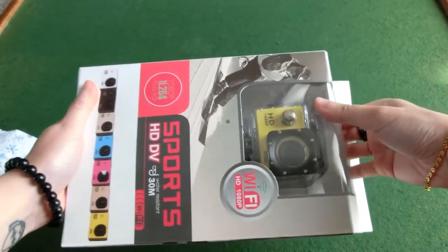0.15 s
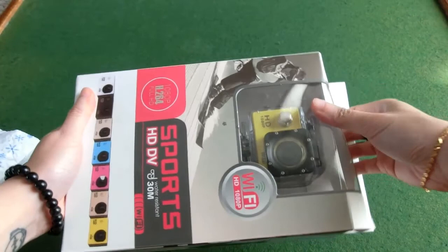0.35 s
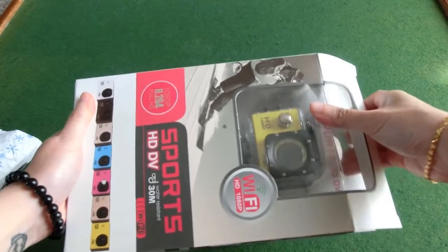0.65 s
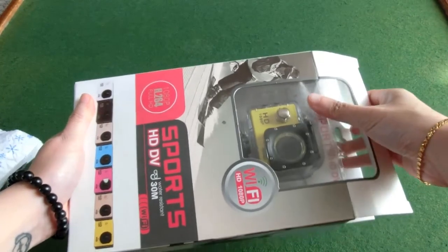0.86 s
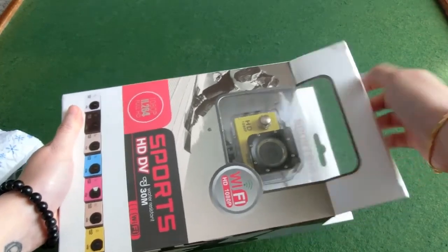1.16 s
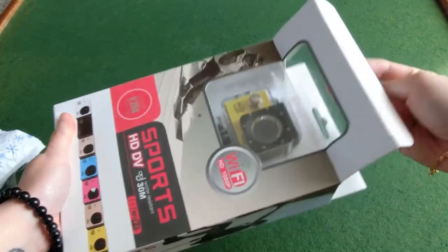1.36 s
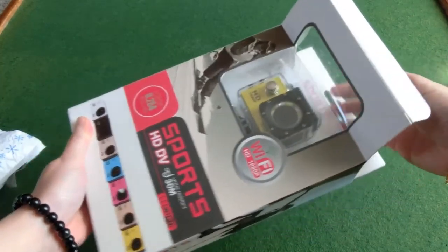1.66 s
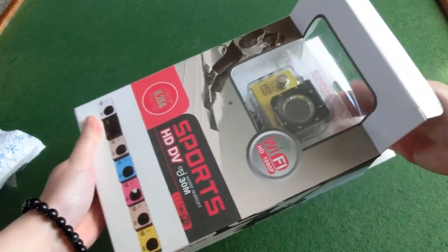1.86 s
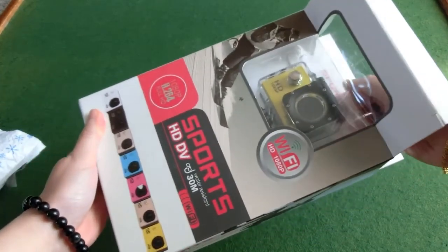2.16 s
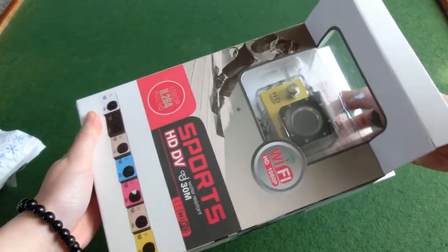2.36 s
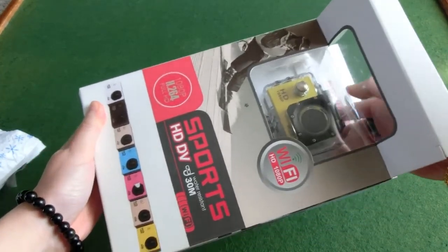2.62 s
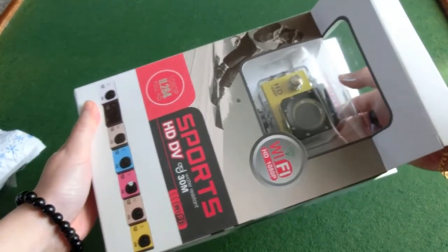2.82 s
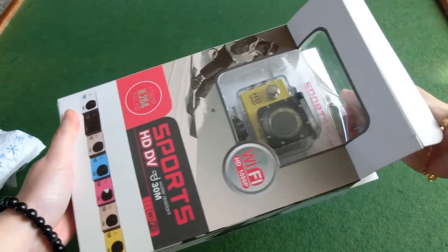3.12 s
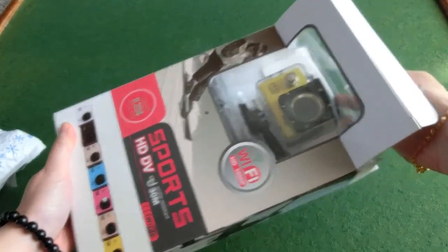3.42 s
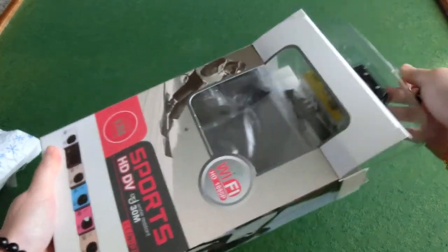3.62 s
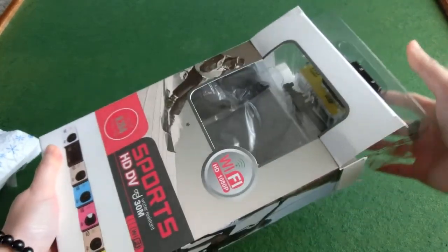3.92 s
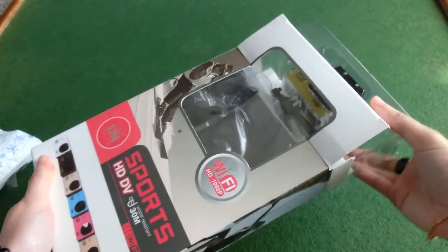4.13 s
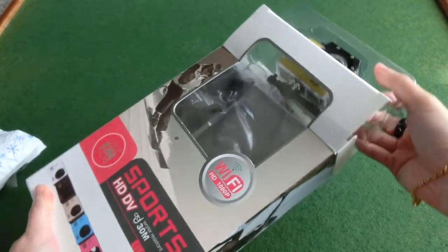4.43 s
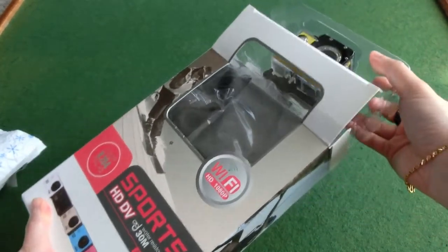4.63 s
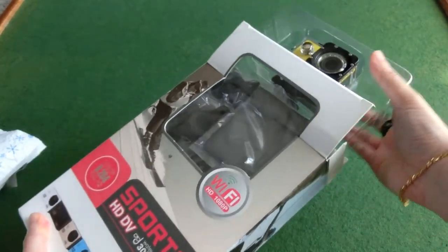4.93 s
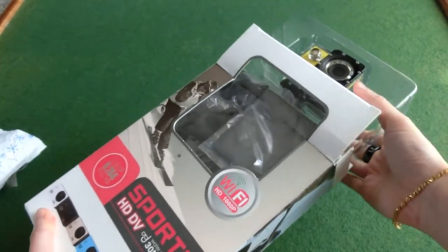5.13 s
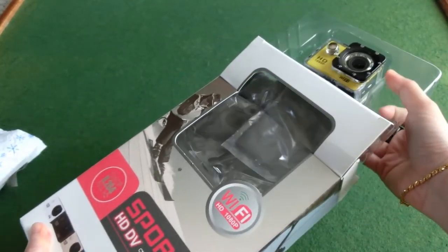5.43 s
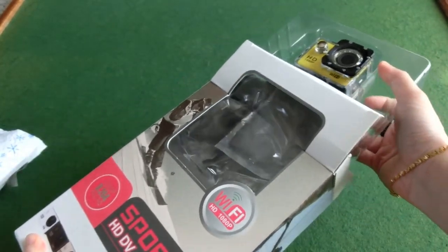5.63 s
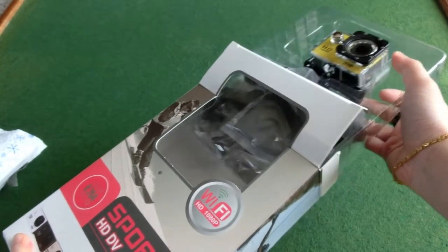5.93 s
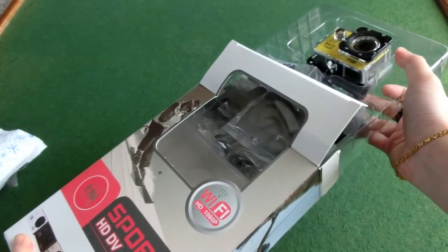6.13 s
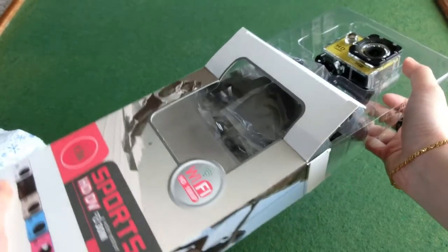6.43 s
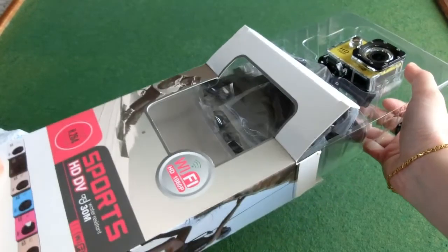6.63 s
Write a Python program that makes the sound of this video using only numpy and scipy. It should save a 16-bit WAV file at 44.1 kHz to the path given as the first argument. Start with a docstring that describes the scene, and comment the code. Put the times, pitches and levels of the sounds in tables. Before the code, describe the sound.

In a small room, close to the microphone, hands work at a cardboard box and its thin plastic tray. A sharp snap lands at 0.1 s, over friction that quickly thins; creaking begins near 0.4 s and a loud crack with a scrape follows at 0.6 s. A low, hollow thud at 1.1 s leads into a strong snap at 1.2 s. From 1.5 to 2.2 s there are only small creaks and soft dull knocks, clearest near 2 s. A very bright double snap strikes at 2.9 s. Plastic squeaks and rubs around 3.4 to 3.8 s, with a knock, then a sparser stretch. A lone snap comes at 4.7 s. From 5.4 s crackles thicken, strongest at 5.9 to 6.0 s, then thin to ticks and faint squeaks from 6.6 s. A short room tail and quiet steady hiss remain throughout.

```python
"""Small room, phone close by: hands pull open a cardboard box's end flap and drag out a thin plastic tray.
Snaps come at once, stronger at 0.6 s and 1.2 s; creaks and dull knocks lead to a bright pair at 2.9 s.
Squeaks follow around 3.5 s, a lone snap at 4.7 s, a dense run from 5.4 s and thin squeaks from 6.6 s.
Buckling bursts ring panels and box modes; stick-slip noise makes the rubs, crackles and squeaks between.
Low thuds, a short room tail and a quiet steady hiss complete the scene at two microphone ports."""
import sys
import numpy as np
from scipy import signal
from scipy.fft import rfft, irfft, next_fast_len
from scipy.io import wavfile
from scipy.ndimage import uniform_filter1d

SR = 44100
rng = np.random.default_rng(int(sys.argv[2]) if len(sys.argv) > 2 else 0)


def wrap_up_sound(samples):
    """Save the sound to the file named by the first command line argument, as 16-bit audio."""
    columns = np.atleast_2d(samples).T
    # keep every value between -1 and 1, then stretch to whole-number steps
    tamed = np.clip(columns, -1, 1)
    steps = np.round(tamed * 32767).astype(np.int16)
    wavfile.write(sys.argv[1], SR, steps)


N = 298767

# card and plastic buckle: [t/s, crack decay/s, card panel f/Hz, plastic sheet f/Hz, level/dB,
# brightness per register/dB, hollow thump above the level/dB]
BUCKLES = [(0.1055, 0.0046, 860, 2870, -32, 4, -14), (.118, 0.00078, 895, 2800, -18, -2, -13.5),
           (.2103, 0.005, 302, 2800, -40.5, -2.5, 3.5), (0.2443, 0.0062, 178, 2660, -39.5, 1.5, -1.5),
           (0.472, 0.00041, 875, 4240, -43, 6.5, -9), (.5741, .001, 1100, 4000, -44.5, 9.5, -17),
           (0.6249, 0.0086, 810, 2370, -16.5, -1, -14), (0.6287, .0005, 760, 1980, -26, -3.5, 3.5),
           (0.64, 0.0023, 670, 2830, -32, 5, -24), (0.6716, 0.00077, 670, 4350, -24.5, 1.5, -3),
           (.786, 0.0052, 236, 4100, -38, 9.5, 2.5), (0.8459, 0.0012, 930, 1930, -44, 2.5, -24),
           (0.9326, 0.00047, 300, 2080, -48, -2.5, -4), (1.0671, 0.036, 1280, 1910, -36.5, 5, 4),
           (1.084, 0.0083, 740, 1590, -35, -12, 6.5), (1.169, 0.0026, 350, 1770, -19.5, 4, -4.5),
           (1.1746, 0.004, 870, 2250, -24.5, -0.5, -7.5), (1.293, 0.0037, 520, 1640, -33, -10, 4),
           (1.541, 0.00065, 470, 2900, -50, -4, -3), (2.247, 0.0016, 960, 1670, -33.5, -2, -13),
           (2.6802, 0.0053, 560, 1540, -33, -3, 3), (2.7724, 0.0021, 820, 3270, -28.5, -0.5, -0.5),
           (2.892, 0.0028, 1120, 2640, -17.5, 1.5, -6.5), (2.9074, 0.0023, 1160, 3700, -15.5, 5, -11.5),
           (3.1044, 0.0051, 1260, 2960, -52, -3.5, -8), (3.154, 0.0012, 1270, 1580, -50.5, -5.5, -22),
           (3.248, 0.00089, 647, 2130, -53.5, -0.5, -12), (3.4104, 0.0037, 705, 3100, -35.5, -9, 4),
           (3.4393, 0.0082, 740, 1620, -41.5, -5, -2), (3.5069, 0.0052, 835, 5330, -38, -1.5, -1),
           (3.5877, 0.0045, 650, 4000, -29.5, 1, -2.5), (3.6216, .0022, 417, 2700, -29.5, .5, -0.5),
           (4.031, 0.0041, 637, 1580, -52.5, -3.5, 1), (4.3495, 0.0063, 1166, 1630, -38.5, -1.5, -4.5),
           (4.3787, 0.0063, 1190, 5000, -38.5, -2, -7), (4.4358, 0.0024, 736, 1540, -41, 2.5, -9),
           (4.67, 0.00083, 770, 5040, -51, 9.5, -10), (4.713, .0017, 1170, 4800, -49, 15.5, -33),
           (4.7306, 0.0045, 791, 2330, -23, -0.5, -9.5), (4.916, 0.0023, 1290, 1540, -37.5, 5, -1),
           (5.061, 0.0024, 410, 4000, -41.5, 3, -0.5), (5.3452, 0.0071, 890, 3050, -38, 6, -9),
           (5.4317, .004, 370, 4180, -46, 12, -2), (5.47, .0016, 866, 6200, -38.5, 8, -2),
           (5.4781, 0.0007, 1170, 6740, -38.5, 11, -6), (5.54, .0014, 955, 3600, -30.5, -0.5, -7.5),
           (5.6381, 0.00028, 765, 3540, -41, 5.5, -14), (5.687, 0.001, 374, 6540, -46.5, 5.5, -9),
           (5.7077, .0022, 365, 6600, -46.5, 5, -10), (5.8084, 0.00052, 905, 3320, -41, 7, -20),
           (5.8235, 0.0092, 830, 1580, -31.5, -2, -7), (5.8509, .0008, 251, 2840, -31, -0.5, -2),
           (5.8692, 0.0022, 840, 3720, -28.5, 7, -13), (5.8808, 0.0065, 785, 2920, -20.5, .5, -14),
           (5.9078, 0.00073, 775, 2830, -29.5, 3, -25), (5.9451, .002, 760, 2660, -42, 10, -19),
           (6.0117, 0.0037, 813, 3230, -20.5, -5, -1), (6.1245, 0.00079, 800, 3000, -33.5, 6, -14),
           (6.3021, .0011, 1230, 4360, -40, 1, -34), (6.3386, .001, 1220, 5240, -46.5, 0, -22),
           (6.3707, 0.0041, 810, 2500, -44.5, -0.5, -23), (6.4397, 0.0012, 1320, 1600, -47, 1.5, -22),
           (6.518, 0.0018, 870, 4430, -39, -3.5, -24), (6.5746, 0.00018, 530, 3970, -45, 3, -14)]
# fingers and tray knock dully on the box: [t/s, card panel f/Hz, level at that f/dB]
DULL_KNOCKS = [(0.0496, 362, -39.5), (0.884, 170, -37), (1.2707, 310, -40.5), (1.527, 390, -38.5),
               (1.547, 346, -38.5), (1.617, 217, -40), (1.659, 350, -42), (1.737, 232, -40),
               (1.9321, 284, -32), (1.9526, 464, -34), (1.986, 398, -29.5), (2.1012, 850, -42.5),
               (2.7126, 720, -37), (2.808, 228, -29), (3.789, 1190, -43), (3.8321, 463, -28),
               (4.178, 227, -42.5), (4.207, 553, -40.5), (4.83, 680, -40), (4.9493, 784, -44),
               (6.5546, 410, -30)]
# modes of the box with its tray: [f/Hz, t60/s, relative level/dB]
BOX_MODES = [(130.3, 0.072, -15.5), (266, 0.044, -13), (342, 0.022, -10.5), (505, 0.028, -6.5),
             (684, 0.029, -11.5), (778.5, 0.042, -0.5), (839, 0.057, -9.5), (1116, 0.023, -12.5),
             (1390, 0.0065, -15.5), (1488, 0.02, -8.5), (2180, 0.026, -16), (2305, 0.016, -1.5),
             (2580, 0.018, -5.5), (3304, 0.015, -11.5), (4080, 0.0086, -1), (5270, 0.013, -5.5),
             (6280, 0.01, -9.5)]
# colour of a crack: [f/Hz, relative density level/dB per Hz]
CRACK_COLOUR = [(130, -9), (300, 3), (600, -1), (1200, 0), (1800, -5), (3000, -4.5), (4200, -11.5),
                (5500, -10), (6800, -7.5), (8000, -5), (12000, -8.5), (16000, -20)]
# the whole box jolts against hand and table: [t/s, f/Hz, level of the swing before its decay/dB]
JOLTS = [(.212, 90, -41), (0.631, 80, -35), (0.787, 100, -39.5), (.878, 120, -39), (1.083, 135, -23.5),
         (1.173, 75.5, -36), (1.292, 90, -45), (1.992, 60, -45), (2.805, 95, -39), (2.898, 70, -34.5),
         (3.835, 91.4, -43.5), (4.731, 70, -46), (5.86, 70, -35.5), (6.01, 85, -36), (6.556, 129, -34)]
# a hand pushes and card and plastic slide: [t of fastest motion/s, rise/s, fall/s, level before the mix/dB,
# brightness per register/dB, hollow rumble above the level/dB]
HAND_STROKES = [(.16, 0.072, 0.45, -48, 0, -4.5), (0.471, 0.027, 0.071, -40.5, -0.5, -1),
                (0.591, 0.011, .02, -45, -2.5, 1), (.655, 0.011, 0.051, -32.5, 1.5, -8.5),
                (0.792, .015, 0.022, -39.5, -3, 0), (.9, 0.044, 0.016, -56.5, -9, 8.5),
                (1.086, 0.015, 0.02, -40.5, -11.5, 4), (1.21, 0.016, 0.033, -46.5, -6, 1),
                (1.33, 0.06, 0.029, -55, -9, -2), (1.446, 0.013, 0.0073, -48.5, 2, 5),
                (1.51, 0.13, 0.073, -52.5, 8.5, 1), (1.75, 0.07, 0.044, -56, 7, 2),
                (1.94, 0.039, 0.068, -41.5, 0.5, 3.5), (2.12, 0.056, 0.054, -54, 1, -4),
                (2.276, 0.028, 0.057, -51.5, -2, -20), (2.58, 0.15, 0.046, -62, -8, 4),
                (2.795, 0.042, 0.039, -43.5, 1, 2), (3.02, .03, 0.018, -43.5, -3.5, -3.5),
                (3.165, 0.053, 0.024, -51.5, -2, -9), (3.28, 0.037, 0.052, -58, -2.5, -23),
                (3.6, 0.082, 0.07, -39.5, -1.5, -3.5), (3.78, 0.041, 0.075, -52.5, 4.5, 5.5),
                (4.059, 0.016, 0.052, -59, 3, 8), (4.201, 0.017, 0.032, -56.5, -1, 2.5),
                (4.458, 0.065, 0.062, -50.5, -0.5, -4), (4.755, 0.038, 0.09, -46, -2, -2.5),
                (4.937, 0.03, 0.041, -44.5, -1.5, 3), (5.079, 0.036, 0.02, -50, 2, 3),
                (5.22, 0.023, 0.11, -57.5, -5, 7), (5.44, 0.062, 0.067, -38, 2, -9.5),
                (5.579, 0.046, 0.033, -50, -4.5, -13), (5.67, 0.029, 0.064, -51, 3.5, -12),
                (5.891, 0.046, 0.041, -33, -3.5, 0), (6.6, 0.071, 0.067, -52.5, 3.5, -12)]
# the hands never lie quite still on the box: [t/s, friction level before the mix/dB]
RESTING_HANDS = [(0, -47.5), (.4, -64), (1, -64.5), (1.8, -71.5), (2.5, -59), (3.3, -65.5), (4, -73.5),
                 (4.6, -69.5), (5.3, -65.5), (6.2, -63), (6.77, -61.5)]
# colour of the friction: [f/Hz, relative density level/dB per Hz]
FRICTION_COLOUR = [(110, -1), (260, 2), (400, 7.5), (620, 0.5), (790, 3), (960, -0.5), (1300, 0.5),
                   (1800, -5), (2900, -3.5), (4300, -7), (5600, -8.5), (8000, -8), (11000, -8.5),
                   (15500, -22)]
# plastic creaks and squeaks on card; slow slips creak, fast ones sing:
# [t/s, length/s, resonance f/Hz, nominal width/Hz, nominal slips per s, level before the fades/dB]
CREAKS_AND_SQUEAKS = [(0.411, .135, 1950, 600, 120, -41), (0.428, .19, 4220, 377, 125, -50),
                      (1.5, 0.1, 2700, 500, 220, -60), (1.466, .094, 3740, 370.4, 250, -50.5),
                      (1.579, 0.056, 3100, 500, 250, -55), (1.694, 0.11, 5230, 410, 400, -57),
                      (1.87, 0.18, 2850, 700, 90, -45), (3.241, 0.071, 2910, 110, 900, -53.5),
                      (3.44, 0.082, 5650, 300, 900, -52), (3.455, 0.17, 3170, 200, 900, -48.5),
                      (3.499, 0.036, 5300, 166.7, 900, -41.5), (3.54, .038, 2960, 400, 600, -42),
                      (3.7, 0.18, 1390, 231.5, 350, -47.5), (5.056, 0.067, 2370, 200, 900, -56),
                      (5.633, 0.043, 4760, 300, 500, -47.5), (6.61, 0.21, 1890, 111, 900, -55.5),
                      (6.614, 0.15, 5240, 170, 900, -66), (6.62, .2, 3870, 201, 900, -59.5),
                      (6.634, .2, 2500, 139, 900, -60)]
# edges of the four registers, hollow of the box, card panels, plastic sheet, sharp edges: [f/Hz]
REGISTER_EDGES = [150, 480, 1400, 4800, 16000]
# decay of the room: [f/Hz, t60/s]
ROOM_DECAY = [(100, 0.24), (260, 0.19), (700, 0.2), (2000, 0.24), (5000, 0.34), (14000, 0.18)]
# room tail against the sound sent into it: [f/Hz, level/dB]
ROOM_TAIL = [(100, -15), (300, -7.5), (800, -10), (2000, -11), (5000, -12), (14000, -12)]
# filter of the difference between the two microphone ports: [f/Hz, gain/dB]
PORT_DIFFERENCE = [(30, -18.5), (100, -21), (300, -46), (700, -38.5), (1400, -38.5), (2800, -19),
                   (5600, -8), (11000, -4), (15000, 2)]
# colour of the background hiss: [f/Hz, relative density level/dB per Hz]
HISS_COLOUR = [(12, -30), (20, 5.5), (130, 6), (388, -0.5), (849, -2), (1000, -14), (1370, -9),
               (1960, -12.5), (2910, -16.5), (4810, -17.5), (11100, -25.5), (14700, -19.5), (16000, -54)]

DIRECTIONS = 4  # a bent sheet sends a different waveform each way
SHEET_RING_S = 0.0013  # fall to 1 / e: thin plastic is damped by the card around it
EDGE_DB = -5.5  # the sharp edges' register lies under the others
KNOCK_SHEET_HZ = 2183  # the slack plastic that a dull knock stirs
KNOCK_S, KNOCK_FALL_DB_PER_OCT = 0.0018, 9  # soft contact: thinner away from the panel's pitch
STROKE_SHAPE = 1.32  # 1 = pointed swell, 2 = bell
HOLD_BRIGHTNESS_DB, HOLD_HOLLOW_DB = 2, -3
# tiny creases give way while the plastic slides; their level is relative to the plastic's friction
CRINKLES_PER_S, CRINKLE_DB, CRINKLE_SCATTER_DB, CRINKLE_S = 130, -5.5, 3, 0.00088
HISS_DB = -60  # the part common to both ports
TOP_HZ = 15600


def snaps():
    """Card and plastic sheets buckle, each with a crack decay of its own."""
    return strike_box([(t, crack_s, panel_hz, sheet_hz, registers(*contact))
                       for t, crack_s, panel_hz, sheet_hz, *contact in BUCKLES])


def knocks():
    """Soft blows by fingers and tray: the sound thins out in octaves away from the panel's pitch."""
    centres = np.sqrt(np.multiply(REGISTER_EDGES[:-1], REGISTER_EDGES[1:]))
    contacts = []
    for t, panel_hz, db in DULL_KNOCKS:
        levels = db - KNOCK_FALL_DB_PER_OCT * np.abs(np.log2(centres / panel_hz))
        contacts.append((t, KNOCK_S, panel_hz, KNOCK_SHEET_HZ, levels))
    return strike_box(contacts)


def strike_box(contacts, panel_db=-7, panel_cycles=2.2, sheet_db=-9, box_db=-14, scatter_db=5.0,
               rattle_db=-25, rattle_s=0.0027, rise_s=0.00013, tick_rough=0.42):
    """A brief crack and a weaker rattle burst; card and plastic swing a few cycles and the box modes ring."""
    out, t = np.zeros((DIRECTIONS, N)), np.arange(3072) / SR
    filters = [bandpass(lo, hi) for lo, hi in zip(REGISTER_EDGES, REGISTER_EDGES[1:])]
    hz, t60, db = np.transpose(BOX_MODES)
    modes = np.sin(2 * np.pi * hz[:, None] * t) * undb(db[:, None] - 60 * t / t60[:, None])
    spread = np.sqrt(0.01 * SR / len(t))  # levels are rms over 10 ms
    for start, crack_s, panel_hz, sheet_hz, levels in contacts:
        force = np.exp(-t / max(crack_s, 1 / SR)) * (1 - np.exp(-t / rise_s))
        force = force / force.max() + undb(rattle_db) * np.exp(-t / rattle_s)
        # roughness held for 16 samples at a time
        slips = np.exp(tick_rough * np.repeat(rng.standard_normal(len(t) // 16), 16))
        crack = colour(force * slips * rng.standard_normal((DIRECTIONS, len(t))), CRACK_COLOUR)
        panel = undb(panel_db) * ring(t, panel_hz, panel_cycles)
        sheet = undb(sheet_db) * ring(t, sheet_hz, sheet_hz * SHEET_RING_S)
        # every direction favours other modes
        shape = (DIRECTIONS, len(hz))
        shares = undb(scatter_db * rng.standard_normal(shape)) * rng.choice([-1, 1], shape)
        blow = crack + panel + sheet + undb(box_db) * shares @ modes
        bands = [undb(level) * unit(signal.sosfilt(f, blow)) for f, level in zip(filters, levels)]
        add(out, start, spread * sum(bands))
    return out


def registers(db, brightness_db, hollow_db):
    """Levels of hollow, card, plastic and edges: a harder contact tips the sound from card towards edges."""
    return db + np.array([hollow_db, -brightness_db, 0, brightness_db + EDGE_DB])


def ring(t, hz, cycles):
    """A damped swing that falls to 1 / e after the given number of cycles."""
    return np.sin(2 * np.pi * hz * t) * np.exp(-t * hz / cycles)


def bumps(cycles=1.3):
    """Soft, heavily damped thuds of the box as a whole."""
    out, t = np.zeros((DIRECTIONS, N)), np.arange(SR // 10) / SR
    for start, hz, db in JOLTS:
        add(out, start, undb(db) * ring(t, hz, cycles)[None])
    return out


def sliding():
    """Strength of the friction in each register: strokes swell and die away over the resting hands."""
    t = np.arange(N) / SR
    hold = undb(np.interp(t, *np.transpose(RESTING_HANDS)))
    power = np.outer(undb(registers(0, HOLD_BRIGHTNESS_DB, HOLD_HOLLOW_DB)), hold) ** 2
    for peak, rise_s, fall_s, *contact in HAND_STROKES:
        near = np.abs(t - peak) < 0.5
        distance = np.maximum((peak - t[near]) / rise_s, (t[near] - peak) / fall_s)
        speed = np.exp(-distance ** STROKE_SHAPE)
        power[:, near] += np.outer(undb(registers(*contact)), speed) ** 2
    return np.sqrt(power)


def stick_slip(slip_s=0.0021, smooth_db=-4, catch_db=-5):
    """Friction force of mean square 1: fine slips, fewer catches and a smooth remainder."""
    decay = [1, -np.exp(-1 / (slip_s * SR))]
    rates = np.array([[600], [90]])  # slips and catches per second
    sizes = undb(4 * np.minimum(rng.exponential(size=(2, N)), 2))
    impulses = sizes * (rng.random((2, N)) < rates / SR)
    slips, catches = unit(signal.lfilter([1], decay, impulses))
    return unit(np.sqrt(slips ** 2 + (undb(catch_db) * catches) ** 2 + undb(smooth_db) ** 2))


def rubbing(grip, strengths, flutter_db=1.94, flutter_rate=55, shift_db=2.5, shift_rate=20):
    """Surfaces catch and let go; the resonances they excite shift as the contact moves."""
    out, pressure_db = 0, flutter_db * walk(flutter_rate)
    for lo, hi, strength in zip(REGISTER_EDGES, REGISTER_EDGES[1:], strengths):
        rub, edges = 0, np.geomspace(lo, hi, 6)
        for a, b in zip(edges, edges[1:]):
            gain = undb(read(FRICTION_COLOUR, np.sqrt(a * b)) + shift_db * walk(shift_rate))
            noise = grip * rng.standard_normal((2, N))
            rub = rub + gain * signal.sosfilt(bandpass(a, b, order=2), noise)
        out = out + strength * undb(pressure_db) * unit(rub)
    return out


def crinkles(strength):
    """Tiny cracks at random moments, as strong as the plastic is being worked."""
    sizes = undb(CRINKLE_SCATTER_DB * rng.standard_normal(N))
    impulses = sizes * (rng.random(N) < CRINKLES_PER_S / SR)
    force = signal.lfilter([1], [1, -np.exp(-1 / (CRINKLE_S * SR))], impulses)
    cracks = colour(force * rng.standard_normal((2, N)), FRICTION_COLOUR)
    return undb(CRINKLE_DB) * strength * unit(cracks)


def squeaks(slip_s=0.001, jitter=0.3, scatter_db=3, glide_db=-16):
    """Uneven slips ring one resonance of the tray; between them the surfaces glide faintly."""
    out = np.zeros((2, N))
    for start, length, hz, width, rate, db in CREAKS_AND_SQUEAKS:
        chance = rng.standard_normal((400, 2))  # gap and size of each slip
        at = (np.cumsum(np.exp(jitter * chance[:, 0])) * SR / rate).astype(int)
        size = int(length * SR)
        slips = np.bincount(at, undb(scatter_db * chance[:, 1]), size)[:size]
        force = unit(signal.lfilter([1], [1, -np.exp(-1 / (slip_s * SR))], slips)) + undb(glide_db)
        noise = force * rng.standard_normal((2, size))
        song = signal.sosfilt(bandpass(hz - width / 2, hz + width / 2, order=1), noise)
        song = signal.sosfilt(bandpass(hz / 2, hz * 2), song)
        add(out, start, undb(db) * unit(song) * signal.windows.tukey(size, 0.6))
    return out


def room(x, early_db=-13, early_s=0.004, gap_s=0.00037):
    """Each direction returns by its own paths: quick reflections from table and hands, then a short tail."""
    t = np.arange(int(SR / 2)) / SR
    onset, response = 1 - np.exp(-(t / gap_s) ** 2), 0
    edges = np.geomspace(60, 17000, 9)
    for lo, hi in zip(edges, edges[1:]):
        hz = np.sqrt(lo * hi)
        tail = unit(onset * undb(-60 * t / read(ROOM_DECAY, hz))) * undb(read(ROOM_TAIL, hz))
        early = unit(onset * np.exp(-t / early_s)) * undb(early_db)
        noise = signal.sosfilt(bandpass(lo, hi), rng.standard_normal((DIRECTIONS, len(t))))
        response = response + noise * np.hypot(tail, early) / np.sqrt(len(t) * DIRECTIONS)
    size = next_fast_len(N + len(t))
    sound, paths = rfft(x, size), rfft(response, size)
    # the second signal takes the same paths in reverse order of direction
    both = np.array([(sound * paths).sum(0), (sound * paths[::-1]).sum(0)])
    return irfft(both, size)[:, :N]


def background_hiss():
    """Steady coloured noise, independent in the sum and difference signals."""
    return undb(HISS_DB) * unit(colour(rng.standard_normal((2, N)), HISS_COLOUR))


def undb(db):
    """Decibels to gain."""
    return 10 ** (np.asarray(db) / 20)


def unit(x):
    """Scale to rms 1."""
    return x / np.sqrt(np.mean(x ** 2, axis=-1, keepdims=True))


def read(points, hz):
    """Value of a [f/Hz, value] table on a log-frequency axis."""
    f, v = np.transpose(points)
    return np.interp(np.log(np.maximum(hz, 1)), np.log(f), v)


def colour(x, points):
    """Causal filter with the given [f/Hz, level/dB] response, built from its cepstrum."""
    size = 4096
    cepstrum = irfft(np.log(undb(read(points, np.fft.rfftfreq(size, 1 / SR)))))
    # folding the cepstrum forward gives minimum phase
    cepstrum[1:size // 2] *= 2
    cepstrum[size // 2 + 1:] = 0
    response = irfft(np.exp(rfft(cepstrum)))
    return signal.fftconvolve(np.atleast_2d(x), response[None], axes=-1)[:, :x.shape[-1]]


def bandpass(lo_hz, hi_hz, order=3):
    """Sections of a band-pass filter."""
    return signal.butter(order, [lo_hz, min(hi_hz, 0.49 * SR)], "band", fs=SR, output="sos")


def walk(rate):
    """Random levels held 1 / rate s and slewed; spread near 1."""
    k = max(int(SR / rate), 1)
    held = np.repeat(rng.standard_normal(N // k + 1), k)
    return unit(uniform_filter1d(held, k)[:N])


def add(out, start, sound):
    """Mix a sound in at time start/s."""
    i = max(int(start * SR), 0)
    out[:, i:i + sound.shape[1]] += sound[:, :max(N - i, 0)]


def scene(rub_db=-1, rub_room_db=-3, diffuse_side_db=1, hiss_side_db=-9):
    """The two ports hear a sum and a difference signal, which become left and right."""
    hits = snaps() + knocks() + bumps()
    strengths = sliding()
    slide = undb(rub_db) * rubbing(stick_slip(), strengths)
    slide = slide + squeaks() + crinkles(strengths[2])  # register 2 is the plastic sheet
    direct = hits[:2] + slide
    # blows and friction share the same room
    tail = room(hits + undb(rub_room_db) * np.tile(slide, (DIRECTIONS // 2, 1)))
    hiss = background_hiss()
    mid = direct[0] + tail[0] + hiss[0]
    side = colour(direct[1] + undb(diffuse_side_db) * tail[1], PORT_DIFFERENCE)[0]
    side = side + undb(hiss_side_db) * hiss[1]
    return np.array([mid + side, mid - side])


def record(dry):
    """Microphone input: peaks beyond its limit are clipped, then the top is cut."""
    clipped = np.clip(dry, -0.85, 0.85)
    return signal.sosfilt(signal.ellip(8, 0.2, 80, TOP_HZ, fs=SR, output="sos"), clipped)


dry = scene()
out = record(dry)
wrap_up_sound(out)
```